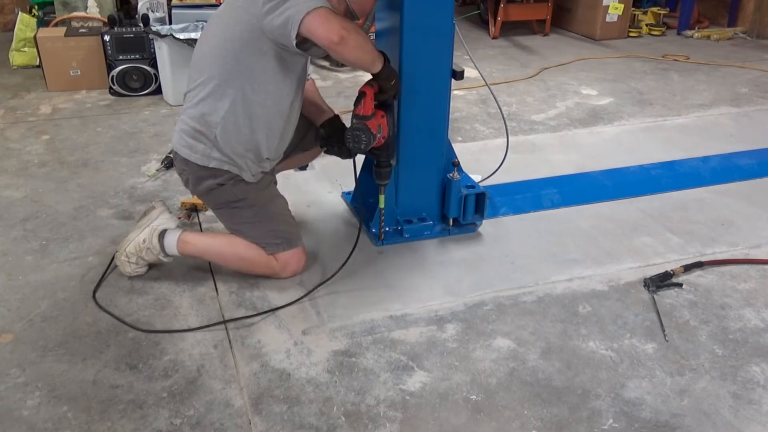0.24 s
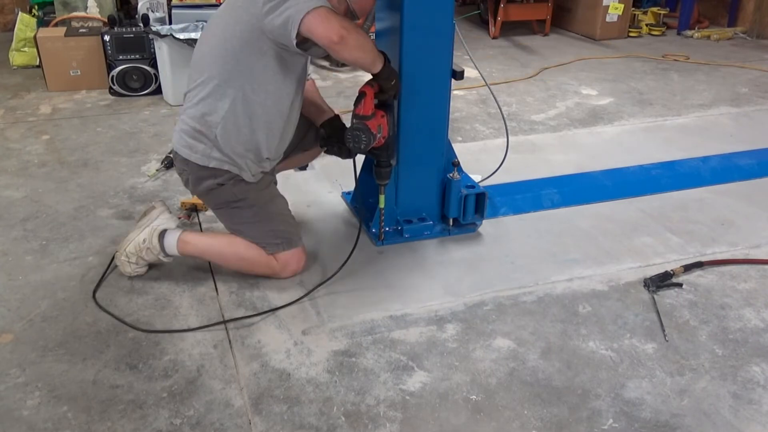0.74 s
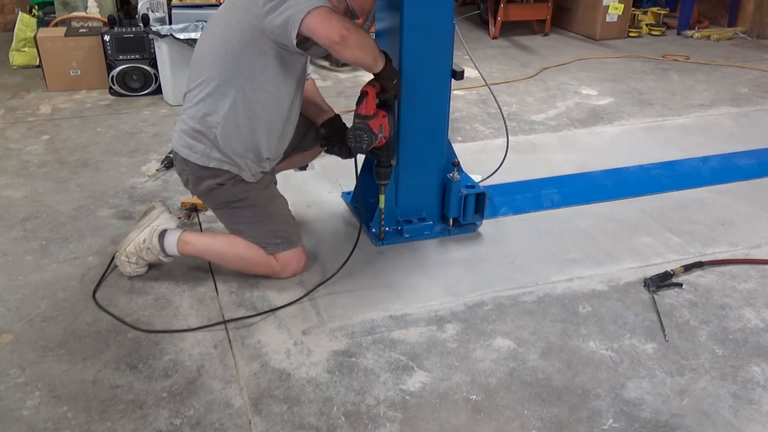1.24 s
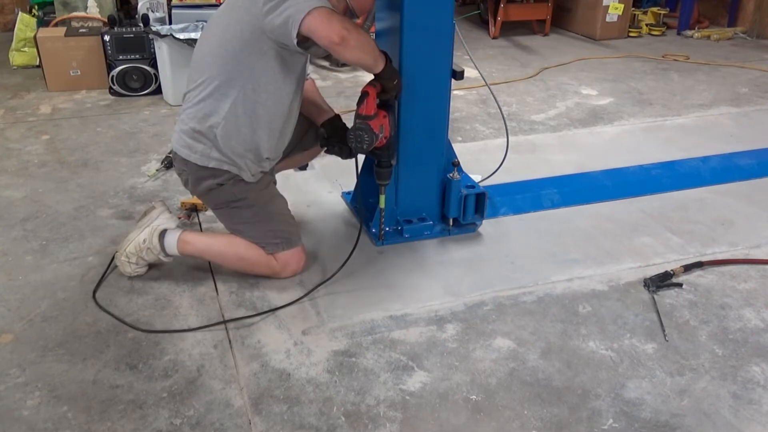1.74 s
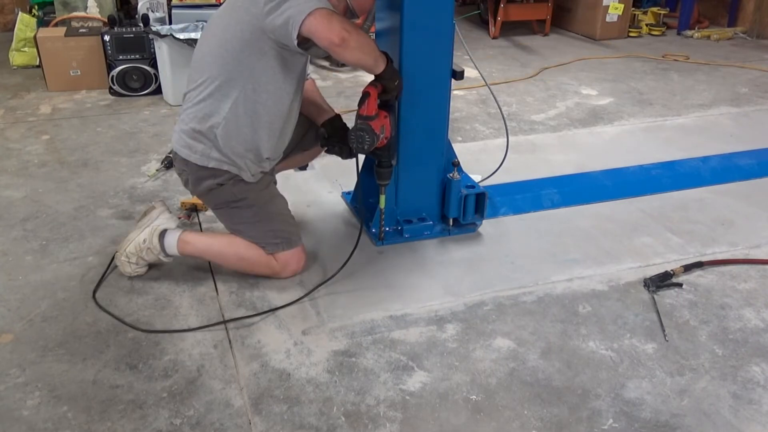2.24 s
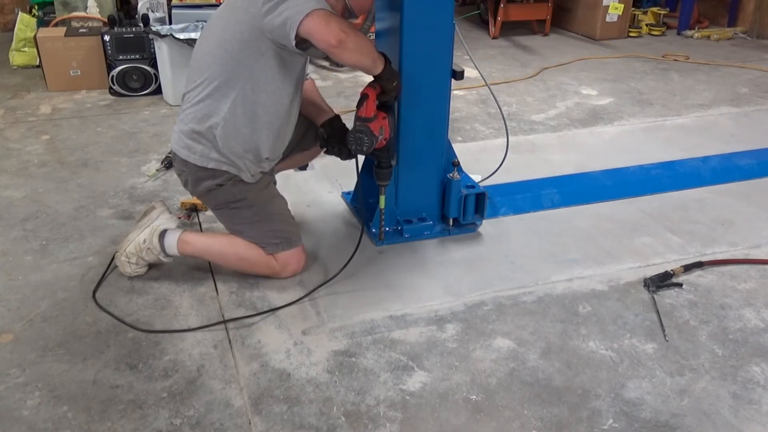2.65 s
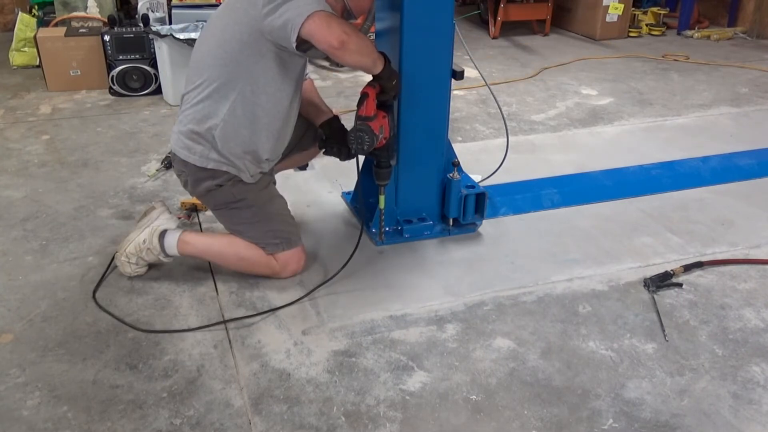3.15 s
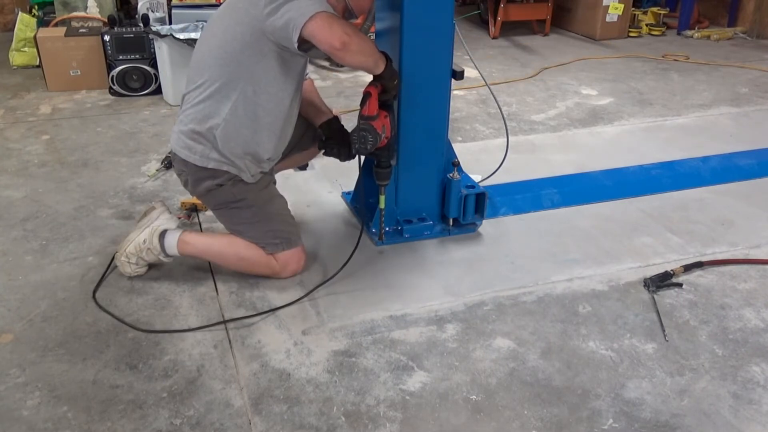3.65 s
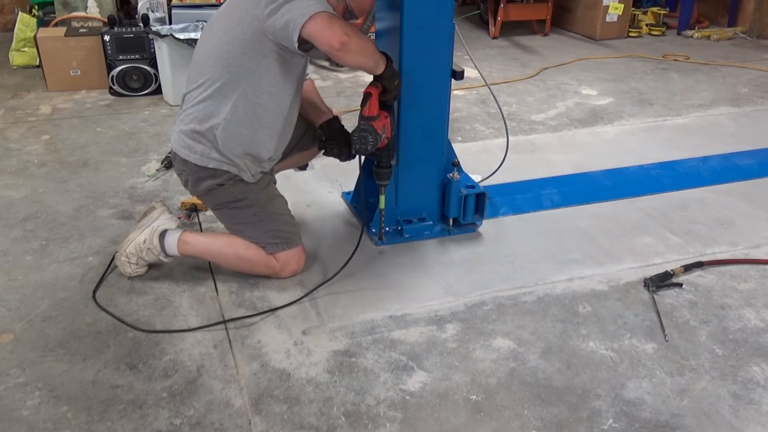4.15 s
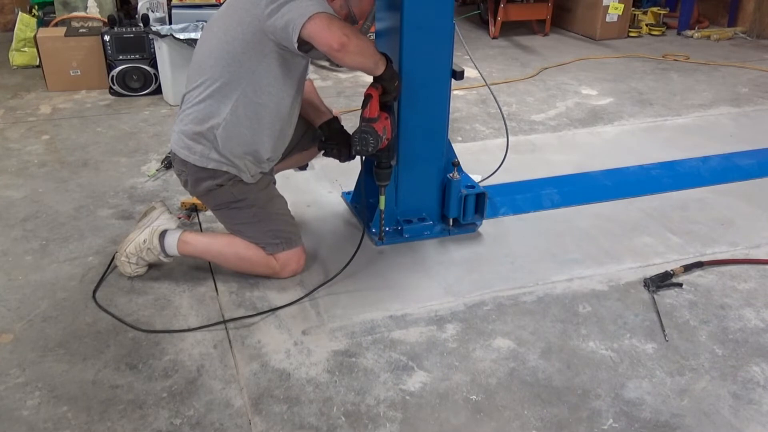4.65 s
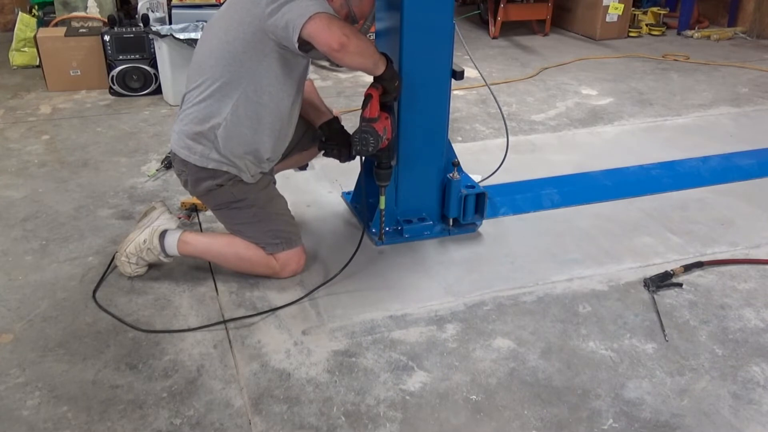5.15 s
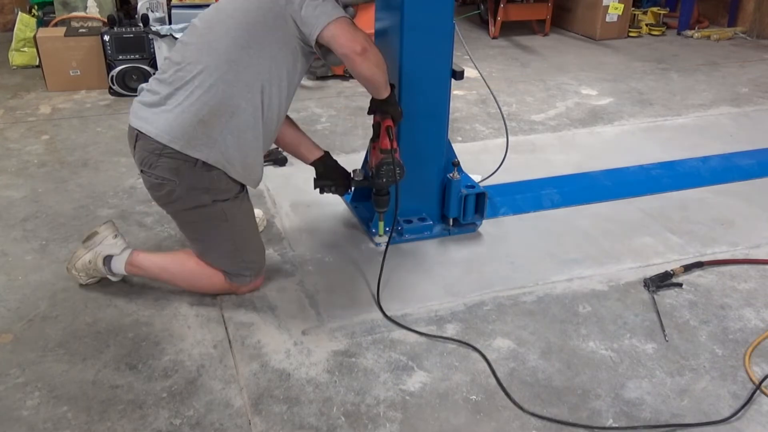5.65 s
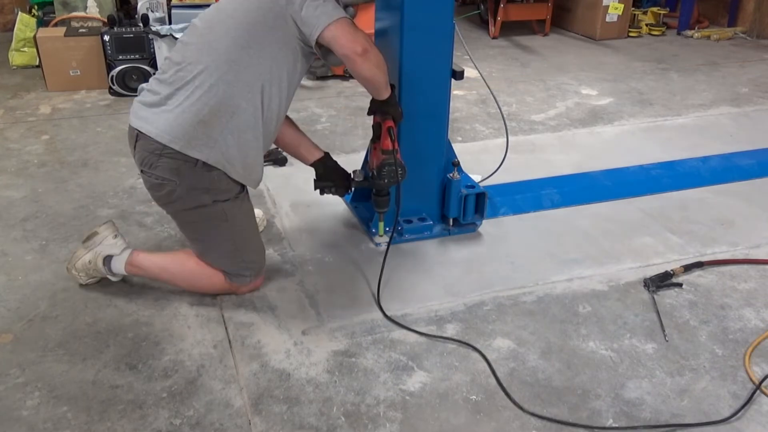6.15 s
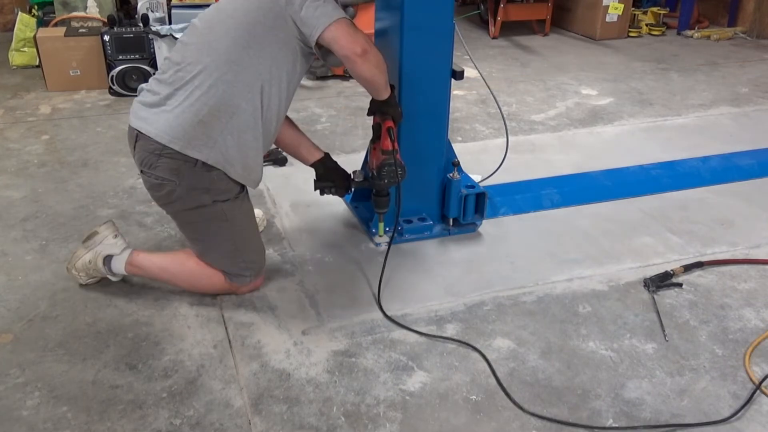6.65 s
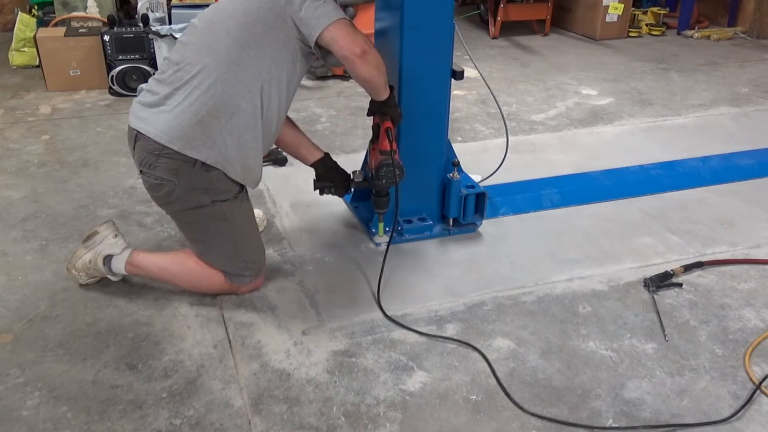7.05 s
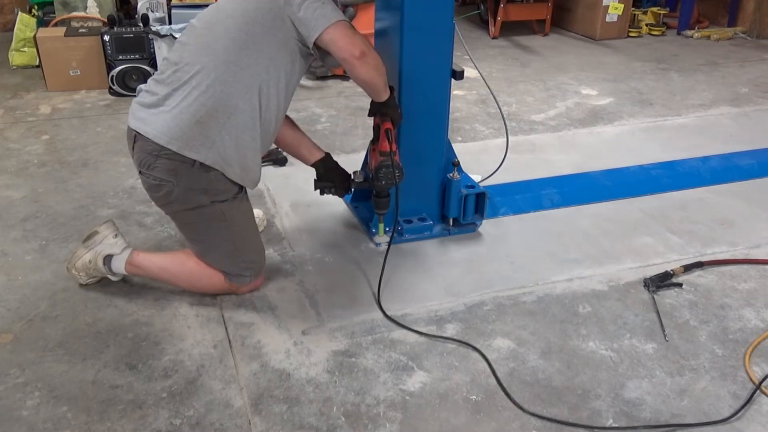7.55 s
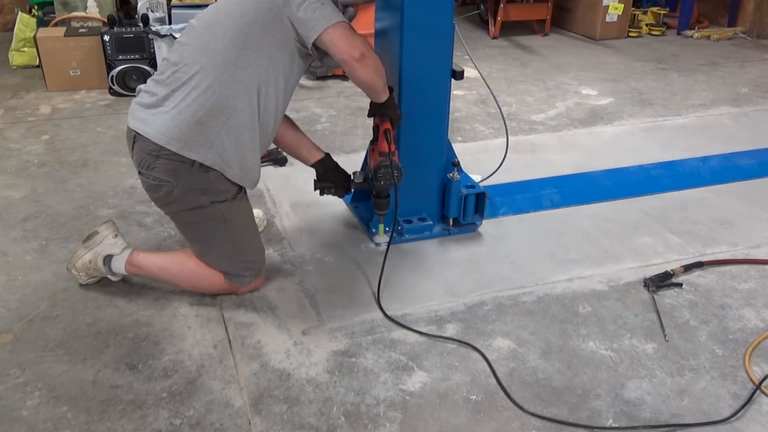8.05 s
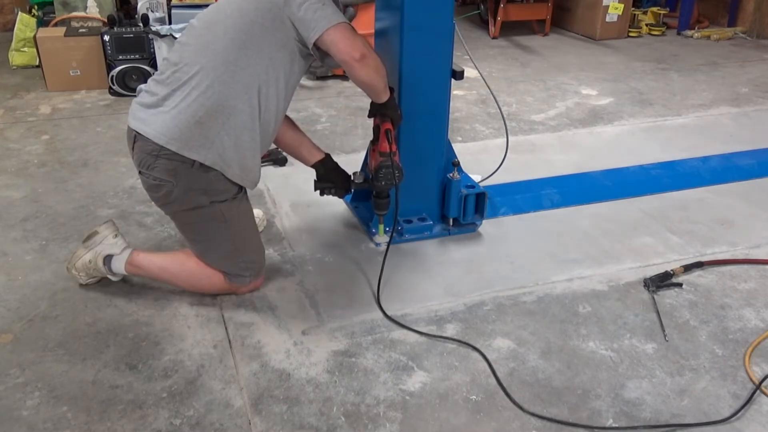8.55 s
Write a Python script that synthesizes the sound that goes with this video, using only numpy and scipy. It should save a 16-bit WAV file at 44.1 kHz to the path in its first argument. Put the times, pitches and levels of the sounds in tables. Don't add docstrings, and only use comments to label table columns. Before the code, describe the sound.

In a quiet garage, a trigger clicks and a rotary hammer drill spins up, pounding concrete unevenly before cutting to a steady full-speed roar.

```python
import sys
import numpy as np
from scipy import signal
from scipy.io import wavfile
from scipy.ndimage import uniform_filter1d, minimum_filter1d

SR = 44100
rng = np.random.default_rng(int(sys.argv[2]) if len(sys.argv) > 2 else 0)


def log_audio(samples):
    frames = np.atleast_2d(samples).T
    limited = np.clip(frames, -1, 1)
    pcm = np.round(limited * 32767).astype(np.int16)
    wavfile.write(sys.argv[1], SR, pcm)


def ratio_of_db(decibels):
    return 10 ** (np.asarray(decibels, float) / 20)


N = 388541
TIME = np.arange(N) / SR
CUTS = (0.204, 5.506)

# frequency in Hz, level in dB per Hz.
AIR = [(18, -64), (30, -34), (55, -11), (95, -23.5), (649, -8), (866, -4), (1960, -14), (2540, -14),
       (2900, -13.5), (14800, -27.5), (16000, -25)]
AIR_DB = (-58, -64.5)
# frequency in Hz, level in dB.
FAR_MODES = [(2600, 0), (3620, -5)]
FAR_PER_S, FAR_DB = 30.1, -68.5
# frequency in Hz, correlation from 0 to 1.
SIDE_LIKENESS = [(60, 0.97), (120, 0.99), (240, 0.99), (480, 0.94), (950, 0.88), (1890, 0.83), (3770, 0.87),
                 (7520, 0.89), (15000, 0.98)]
# frequency in Hz, left over right in dB.
SIDE_LEAN = [(60, 2), (180, -2), (550, 0.5), (1650, -0.5), (4970, -0.5), (15000, -1)]

# time in seconds, peak level in dB.
CLICKS = [(0.0159, -45), (0.7296, -47), (0.736, -45), (0.8116, -49), (0.827, -37), (0.8455, -40),
          (0.862, -35.5), (1.1644, -49), (1.197, -27), (1.248, -27), (1.285, -26), (1.32, -25)]
# time in seconds, level in dB, frequency in Hz.
STALL_HUM = [
    (.76, -90, 2190),
    (.8, -77, 2200),
    (.88, -77, 2210),
    (.92, -88, 2200),
    (.96, -72, 2200),
    (1.03, -67, 2240),
    (1.09, -62, 2270),
    (1.12, -95, 2270),
]

# time in seconds, blow rate in blows per second.
PISTON_SPEED = [(1.396, 8.96), (1.95, 17.52), (2.25, 25.34), (2.26, 26.2), (2.85, 33.31), (2.96, 39.24),
                (3.11, 46.97), (3.36, 32.25), (3.6, 24.44), (3.83, 21.34), (4.13, 26.44), (4.45, 28.23),
                (5.03, 27.51), (5.506, 27.76)]
FIRST_BLOW_S = PISTON_SPEED[0][0]
STEADY_START_S, STEADY_PER_S = 5.5125, 51.63
SLOW_PER_S, WORKING_PER_S = 11.3, 31.8
BLOW_RATE = np.where(TIME > CUTS[1], STEADY_PER_S, np.interp(TIME, *np.transpose(PISTON_SPEED)))
LOOSE = np.clip((BLOW_RATE - SLOW_PER_S) / (WORKING_PER_S - SLOW_PER_S), 0, 1)

# time in seconds, roar level in dB.
EFFORT = [(.95, -76), (1.05, -74.5), (1.2, -53), (1.3, -46), (1.385, -42.5), (1.4, -39), (1.6, -35),
          (2, -31), (2.5, -32), (2.8, -34), (3.1, -33), (3.9, -39.5), (4.3, -35.3), (5, -35), (5.49, -33),
          (5.52, -29.5), (7, -28.5), (8.81, -27)]
EFFORT_DB = np.interp(TIME, *np.transpose(EFFORT))
# frequency in Hz, level in dB per Hz.
ROAR_SPIN_UP = [(18, -85), (30, -55), (138, -54), (241, -26), (274, -38), (407, -20), (767, -3), (1370, -2),
                (3350, -2), (9620, -9.5), (14700, -35), (16300, -65)]
# frequency in Hz, level in dB per Hz.
ROAR_FIRST = [(18, -73), (30, -51), (175, -42.5), (367, -32), (767, -15), (1230, -16.5), (2140, -12.5),
              (2650, -8.5), (3630, -11), (5530, -8.5), (7300, -11), (7850, -1.5), (10700, -16),
              (11900, -24.5), (16300, -31)]
# frequency in Hz, level in dB per Hz.
ROAR_FULL = [(18, -71), (30, -21), (162, -57), (289, -26), (429, -26.5), (808, -6), (1330, -8.5),
             (2440, -7), (2650, -4.5), (3020, -5.5), (7350, -7.5), (7900, -1.5), (11600, -16), (16300, -27)]
BODY_DB, RATTLE_DB = (0, -8), (-6, 9.5)
BODY_FADE_DB_PER_S, RATTLE_FULL_DB = 36, 4

# multiple of rotor speed, level in dB.
ROTOR_ORDERS = [(14, -15), (28, 0), (42, -20)]
# blow rate in blows per second, level in dB.
WHINE = [(9, -70), (22, -57), (25, -48), (28, -45.5), (35, -41.5), (40, -54), (48, -55), (51, -33)]
ROTOR_TURNS_PER_BLOW = 17 / 3
ROTOR_DB = -56.5
COAST_DB, COAST_PER_S2 = -9, 40

# multiple of the blow rate, level in dB.
PISTON_LINES = [(4, -92), (7, -60), (9, -61.5), (10, -53), (11, -58.5), (12, -55), (13, -54), (14, -63.5),
                (16, -46.5), (18, -50), (19, -49)]
# frequency in Hz, width in Hz, level in dB above the roar.
HOUSING_TONES = [(578.5, 12, -25.5), (772, 17, -19), (866, 17, -18), (307, 96, -30)]

# frequency in Hz, width in Hz,
# level in dB in the first hole, level in dB in the second.
BIT_MODES = [(2620, 65, -12.5, -6), (2760, 160, -17, -11), (3410, 130, -24, -11), (5480, 200, -12, -10),
             (7580, 90, -11, -14), (7795, 130, 0, -2), (8110, 220, -10, -13), (8500, 400, -10, -5),
             (9400, 400, -14, -9), (10520, 140, -15, -15), (11000, 200, -19, -16), (12800, 600, -26, -20),
             (13880, 220, -24, -16), (14800, 900, -27, -19), (15700, 65, -19, -14)]
SEATED_S, SEATING_S, SEATING_DB, SEATING_HZ = 2.25, .6, 9, 7950
# frequency in Hz, level in dB.
CRACK = [(800, -27), (2500, -8.5), (5000, 0.5), (7000, 0), (9200, 6.5), (11500, -9.5), (16000, -16)]
# time in seconds, level in dB relative to its blow.
REBOUND = [(1.4, -3), (2.1, -5), (2.5, -13), (5.5, -14), (8.8, -11)]
# time in seconds, crack level in dB, bit ring level in dB.
ACCENTS = [(1.396, -28, -25.5), (1.5, -20, -28), (1.588, -18.5, -20), (1.666, -24, -19), (1.872, -17, -37),
           (2.039, -17, -22), (2.219, -24, -10.5), (2.477, -24, -13), (2.511, -30, -8.5), (2.545, -35, -18),
           (2.644, -32, -24), (2.832, -26, -12), (2.862, -27, -13), (2.891, -29.5, -14), (2.995, -27, -15),
           (3.065, -26, -25), (3.175, -31, -14), (3.362, -28, -10.5), (3.495, -33, -12), (3.61, -15, -15.5),
           (3.875, -21, -19), (4.045, -28, -20), (4.452, -24, -16.5), (4.56, -31, -11), (4.845, -29, -13.5),
           (5.136, -24, -18), (5.281, -35, -13.5), (5.352, -26, -20), (5.461, -33, -9.5), (5.497, -28, -18)]
BLOW_CRACK_DB, BLOW_RING_DB = (-18, -26.5), (-37.5, -19.5)
CRACK_SPREAD_DB, RING_SPREAD_DB, TRADE = 3, 4, 0.76
STEADY_DB = (-24.5, -29)

CEILING_DB = (-19.5, -25.5)


def evened(x):
    return x / np.sqrt(np.mean(x ** 2) + 1e-20)


def read(points, hz):
    f, value = np.transpose(points)
    return np.interp(np.log(hz + 1), np.log(f + 1), value)


def slow(top_hz):
    return evened(np.interp(TIME * top_hz, np.arange(1000), rng.standard_normal(1000)))


def colour(points, size):
    log_gain = np.log(ratio_of_db(read(points, abs(np.fft.fftfreq(4096, 1 / SR)))))
    phase = -signal.hilbert(log_gain).imag
    return np.fft.ifft(np.exp(log_gain + 1j * phase)).real[:size]


def resonate(x, hz, width):
    return signal.lfilter(*signal.iirpeak(min(hz, SR / 2 - 1), hz / width, SR), x)


def spikes(s, db):
    train = np.zeros(N)
    np.add.at(train, np.minimum((s * SR).astype(int), N - 1), ratio_of_db(db))
    return train


def stereo_noise(db_of, patchy_db):
    frames, hz = N // 128 + 5, np.fft.rfftfreq(512, 1 / SR)[:, None]
    a, b, c, d, patches = rng.standard_normal((frames, 257, 5)).T
    patches = evened(uniform_filter1d(uniform_filter1d(patches, 7, 0), 16, 1))
    same = np.clip(read(SIDE_LIKENESS, hz), -1, 1)
    lean = ratio_of_db(read(SIDE_LEAN, hz) / 2)
    left = a + 1j * b
    right = same * left + np.sqrt(1 - same ** 2) * (c + 1j * d)
    z = np.array([left * lean, right / lean])
    z *= ratio_of_db(db_of(hz, np.arange(frames) * 128 / SR) + patchy_db * patches)
    return signal.istft(z, nperseg=512, noverlap=384)[1][:, :N]


def by_speed(pair, t=TIME):
    return pair[0] + (pair[1] - pair[0]) * np.interp(t, TIME, LOOSE)


def mode_db(hz, db, full_db, t):
    lean = np.sign(hz - SEATING_HZ) * (abs(hz - SEATING_HZ) < 400)
    unseated = np.clip((SEATED_S - t) / SEATING_S, 0, 1)
    return np.where(t < CUTS[1], db, full_db) + SEATING_DB * (lean + .3 * abs(lean)) * unseated


def garage(x, t60=0.39):
    taps = rng.choice([-1., 1.], (2, SR // 2)) * (rng.random((2, SR // 2)) < .05)
    t = np.arange(SR // 2) / SR
    taps = taps * ratio_of_db(-60 * t / t60) * (t > .003)
    taps = signal.lfilter(*signal.butter(2, [300, 9500], "band", fs=SR), taps)
    return signal.fftconvolve(x[None], taps / np.linalg.norm(taps[0]), axes=1)[:, :N]


def air():
    s = np.arange(.215, .75, 1 / FAR_PER_S)
    beats = spikes(s, FAR_DB + 2.2 * rng.standard_normal(len(s)))
    beats = signal.oaconvolve(beats, np.hanning(500))[:N]
    far = sum(ratio_of_db(db) * resonate(rng.standard_normal(N), hz, 200) for hz, db in FAR_MODES)
    level_db = np.where(TIME < CUTS[0], *AIR_DB)
    noise = evened(stereo_noise(lambda hz, t: read(AIR, hz) + 0 * t, patchy_db=1.4))
    return ratio_of_db(level_db) * noise + evened(far) * beats


def trigger():
    s, db = np.transpose(CLICKS)
    decay = np.exp(-np.arange(900) / SR / 0.0034)
    puffs = signal.oaconvolve(spikes(s, db - 5.5), decay)[:N] * rng.standard_normal(N)
    clicks = signal.sosfilt(signal.butter(4, [1900, 10300], "band", fs=SR, output="sos"), puffs)
    bit_ring = ratio_of_db(11) * resonate(puffs * (TIME > 1.1), 5500, 200)
    s, db, hz = np.transpose(STALL_HUM)
    hum_hz = np.interp(TIME, s, hz) * (1 + .007 * slow(150))
    hum = np.sin(2 * np.pi * np.cumsum(hum_hz) / SR)
    hum_db = np.interp(TIME, s, db, -200, -200) + 6 + 1.2 * slow(60)
    return clicks + bit_ring + hum * ratio_of_db(hum_db)


def roar(cycle):
    def body(hz):
        return hz ** 2 / (hz ** 2 + 600 ** 2) / (1 + (hz / 2600) ** 4)

    def body_db(t):
        thinning = BODY_FADE_DB_PER_S * np.minimum(FIRST_BLOW_S - t, .33) - 8.0
        return by_speed(BODY_DB, t) + np.where(t < FIRST_BLOW_S, thinning, 0)

    def shape(points, hz):
        return read(points, hz[:, 0]) - np.mean(read(points, np.linspace(3000, 7000, 9)))

    def level_db(hz, t):
        stage = np.searchsorted([FIRST_BLOW_S, CUTS[1]], t)
        shapes = np.array([shape(p, hz) for p in (ROAR_SPIN_UP, ROAR_FIRST, ROAR_FULL)]).T
        return shapes[:, stage] + body(hz) * (body_db(t) + 8)

    x = stereo_noise(level_db, patchy_db=0.85)
    x /= np.std(signal.sosfilt(signal.butter(4, [3000, 7000], "band", fs=SR, output="sos"), x))
    swell_db = 1.02 * np.cos(4 * np.pi * (cycle - .05)) + 0.85 * slow(90) + 0.45 * slow(25)
    return x * ratio_of_db(EFFORT_DB + swell_db + 3.5)


def motor():
    jitter = 1 + .0009 * slow(30) + .0005 * slow(4)
    turns = np.cumsum(BLOW_RATE * ROTOR_TURNS_PER_BLOW * jitter) / SR
    load = 1 + .5 * np.cos(2 * np.pi * turns / ROTOR_TURNS_PER_BLOW)
    slowing = np.clip(-np.gradient(BLOW_RATE) * SR / COAST_PER_S2, 0, 1)
    coast_db = COAST_DB * slowing + 1.8 * slow(14) * (TIME < CUTS[1])
    whine = sum(ratio_of_db(db + 1.6 * slow(20)) * np.sin(2 * np.pi * k * turns) for k, db in ROTOR_ORDERS)
    whine_db = np.interp(BLOW_RATE, *np.transpose(WHINE)) + coast_db + 6
    rotor = ratio_of_db(ROTOR_DB + 6.5 + 0.63 * slow(12)) * np.sin(2 * np.pi * turns) * (TIME > CUTS[1])
    return ratio_of_db(whine_db) * whine * load * (TIME > FIRST_BLOW_S) + rotor


def housing():
    drive = rng.standard_normal(N)
    tones = sum(ratio_of_db(db) * evened(resonate(drive, hz, width)) for hz, width, db in HOUSING_TONES)
    return tones * ratio_of_db(EFFORT_DB) * (TIME > FIRST_BLOW_S) * (TIME < CUTS[1])


def thump():
    lines = np.zeros(N)
    for k, db in PISTON_LINES:
        tone = np.sin(2 * np.pi * (k * STEADY_PER_S * TIME + rng.random()))
        lines += ratio_of_db(db + 4.0 + 1.1 * slow(5)) * tone
    return lines * (TIME > CUTS[1])


def rattle():
    strength = ratio_of_db(3.5 * np.minimum(rng.exponential(1, N), 5))
    knocks = (rng.random(N) < 420 / SR) * strength * rng.choice([-1, 1], N)
    drive = evened(knocks) + 0.12 * rng.standard_normal(N)
    ringing = np.zeros(N)
    for hz, width, db, full_db in BIT_MODES:
        mode = resonate(resonate(drive, hz, 1.5 * width), hz, 1.5 * width)
        ringing += ratio_of_db(mode_db(hz, db, full_db, TIME)) * evened(mode)
    grit = evened(signal.oaconvolve(knocks, colour(CRACK, size=256))[:N])
    engaged = np.clip((TIME - FIRST_BLOW_S) / .01, 0, 1)
    rattle_db = np.where(TIME < CUTS[1], by_speed(RATTLE_DB), RATTLE_FULL_DB) - 3.0 - 4.4 * (TIME > CUTS[1])
    return ratio_of_db(EFFORT_DB + rattle_db) * (ringing + ratio_of_db(-22) * grit) * engaged


def all_blows():
    strokes = np.cumsum(BLOW_RATE * (TIME >= FIRST_BLOW_S)) / SR
    count = int(np.interp(CUTS[1], TIME, strokes)) + 1
    s = np.interp(np.arange(count), strokes, TIME)
    a, b = rng.standard_normal((200, 2))[:len(s)].T
    crack_db = by_speed(BLOW_CRACK_DB, s) + CRACK_SPREAD_DB * a
    ring_db = by_speed(BLOW_RING_DB, s) + RING_SPREAD_DB * (b - TRADE * a)
    first = np.c_[s, crack_db, ring_db]
    nearest = abs(s[1:, None] - np.array(ACCENTS)[1:, 0]).argmin(axis=0) + 1
    first[nearest] = ACCENTS[1:]
    first[0] = ACCENTS[0]
    s = np.arange(STEADY_START_S, N / SR - .002, 1 / STEADY_PER_S)
    chance = rng.standard_normal((200, 3))[:len(s)]
    steady = np.c_[s, np.ones((len(s), 1)) * STEADY_DB] + chance * (.0002, 2.5, 5)
    return np.vstack([first, steady])


def hammer(blows):
    s, crack_db, ring_db = blows.T
    chance = rng.standard_normal((300, 4 + 2 * len(BIT_MODES)))[:len(s)]
    rebound_db = np.interp(s, *np.transpose(REBOUND))
    s = np.r_[s, s + .009 + .0005 * chance[:, 0]]
    crack_db = np.r_[crack_db, crack_db + rebound_db + 2.2 * chance[:, 1]]
    ring_db = np.r_[ring_db, ring_db + rebound_db - 3 + 2.2 * chance[:, 2]]
    t = np.arange(900) / SR
    burst = (1 - np.exp(-t / .0002)) * np.exp(-t / .0016 - (t / .005) ** 4)
    puffs = signal.oaconvolve(spikes(s, crack_db + 12.5), burst)[:N] * rng.standard_normal(N)
    tone = colour(CRACK, size=256)
    out = signal.oaconvolve(puffs, tone / np.linalg.norm(tone))[:N]
    for k, (hz, width, db, full_db) in enumerate(BIT_MODES):
        shares_db = 3.2 * np.r_[chance[:, 4 + 2 * k], chance[:, 5 + 2 * k]]
        shares_db = shares_db - 5 * abs(np.log2(hz / 7800))
        envelope = (1 - np.exp(-t / .0004)) * np.exp(-t * 1.1 * width - (t / .0052) ** 4)
        ring = np.sin(2 * np.pi * hz * t) * envelope
        strikes = spikes(s, ring_db + mode_db(hz, db, full_db, s) + shares_db + 10.5)
        out += signal.oaconvolve(strikes, ring)[:N]
    return out


def scene():
    blows = all_blows()
    cycle = np.interp(TIME, blows[:, 0], np.arange(len(blows)))
    near = hammer(blows) + rattle()
    switch = trigger()
    reflected = garage(ratio_of_db(-15.0) * near + ratio_of_db(-6.0) * switch)
    running = np.clip((TIME - .95) / 0.027, 0, 1)
    machine = thump() + housing() + motor() + roar(cycle) * running
    return near + switch + reflected + machine + air()


def low_pass(x):
    return signal.sosfilt(signal.butter(12, 16870, fs=SR, output="sos"), x)


def record(dry):
    power_db = 10 * np.log10(uniform_filter1d((dry ** 2).mean(0), 40) + 1e-12)
    over_db = np.maximum(power_db - np.where(TIME < CUTS[1], *CEILING_DB), 0)
    ahead_db = -minimum_filter1d(-np.r_[over_db[75:], np.zeros(75)], 151)
    fall = TIME * 600
    held_db = np.maximum.accumulate(ahead_db + fall) - fall
    limited = dry / ratio_of_db(.72 * uniform_filter1d(held_db, 50))
    fades = np.prod([np.clip(abs(TIME - s) / 0.0064, .03, 1) for s in CUTS], axis=0)
    edge = signal.firwin(511, 15890, window=("kaiser", 8), fs=SR)
    return low_pass(signal.oaconvolve(limited * fades, edge[None], "same"))


dry = scene()
out = record(dry)
log_audio(out)
```